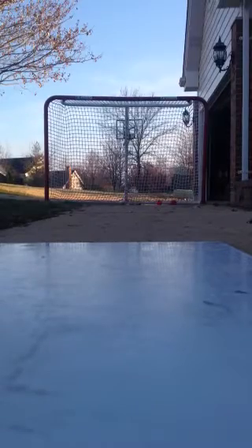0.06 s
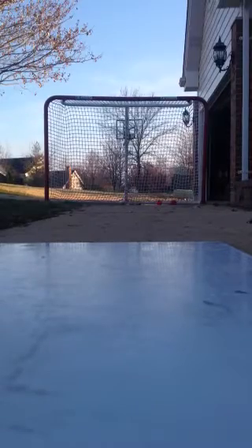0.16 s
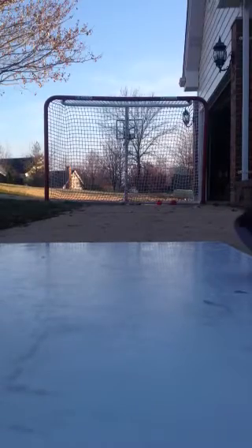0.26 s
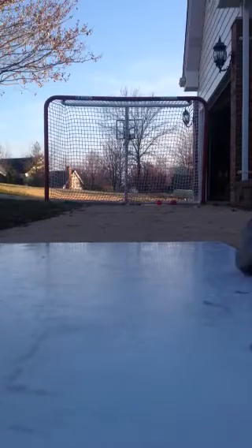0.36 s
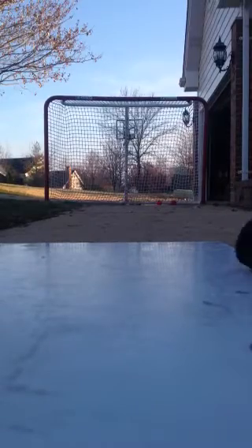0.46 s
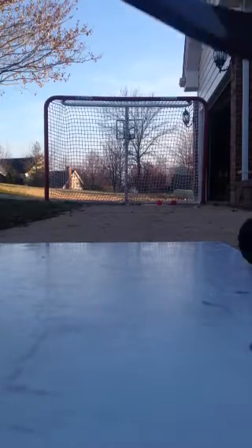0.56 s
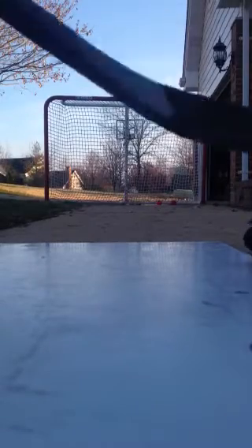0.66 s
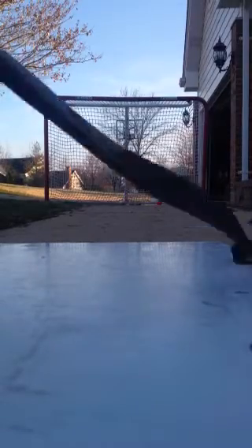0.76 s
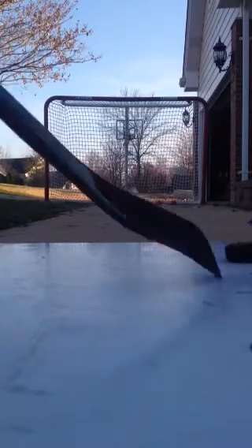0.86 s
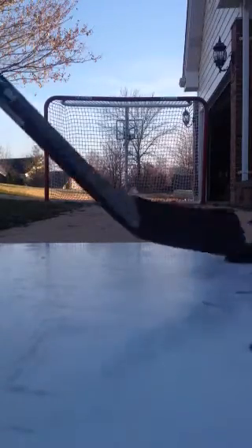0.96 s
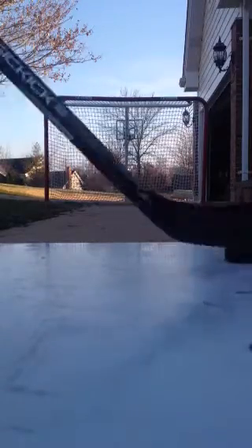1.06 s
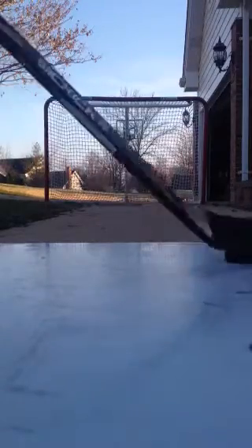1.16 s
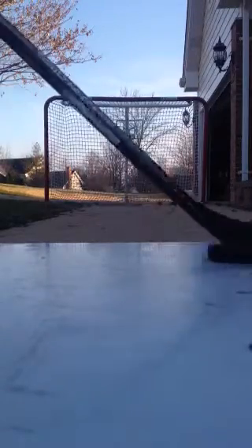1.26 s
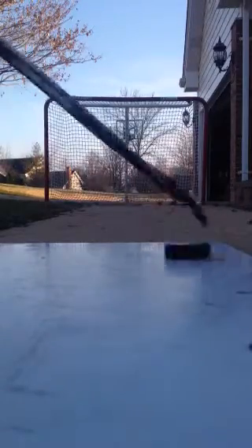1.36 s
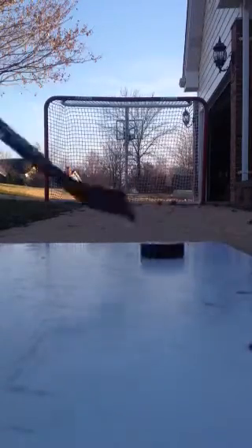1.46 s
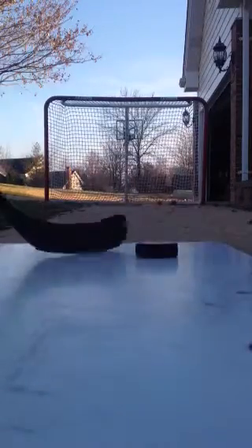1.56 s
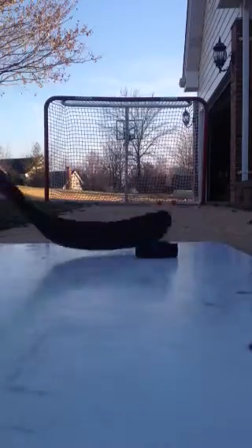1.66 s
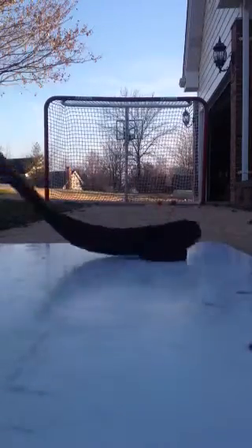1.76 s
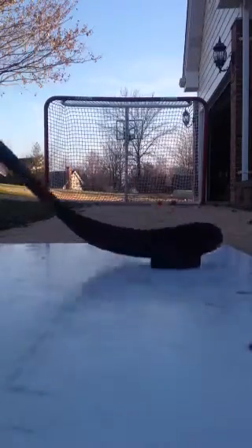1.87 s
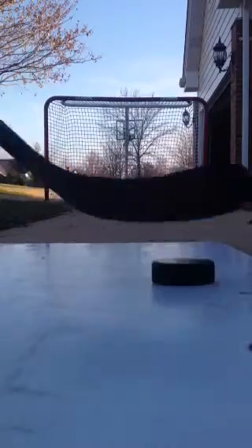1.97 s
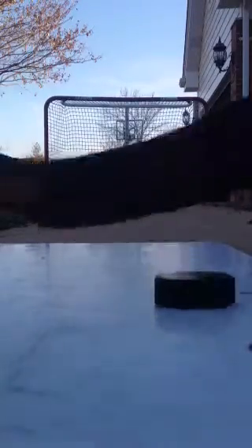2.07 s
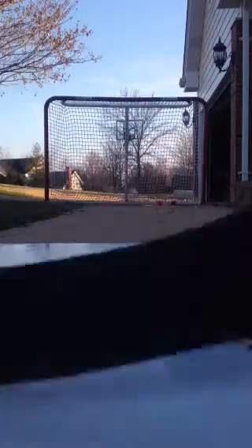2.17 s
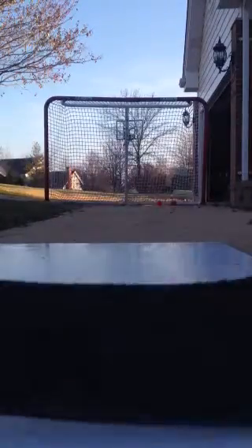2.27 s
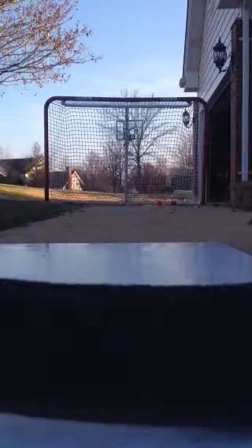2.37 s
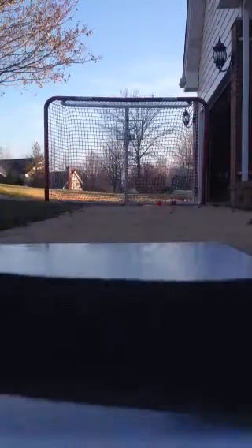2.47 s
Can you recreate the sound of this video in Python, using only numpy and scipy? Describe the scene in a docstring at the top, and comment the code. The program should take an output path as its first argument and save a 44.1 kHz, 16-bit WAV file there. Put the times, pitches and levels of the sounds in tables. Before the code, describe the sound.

A hockey stick clacks against a puck on a plastic pad, very close, with short driveway echoes. At 0.25 seconds the puck slaps down sharply and rattles. Light hollow taps cluster around 0.8 to 1 second. From 1.3 seconds the puck slides in hissing stretches, with a hard clack at 1.6, a thud at 1.75, a tiny squeak at 1.9, a firm hit at 2.25 and another thud just after.

```python
"""Stick and puck in a driveway

Close up, from a phone lying on the plastic practice pad. The puck slaps down and rattles,
the blade clacks against puck and pad, the puck thuds and slides with a fine hiss and one squeak.
The house wall and the yard answer each blow; the microphone port rings near 6 kHz."""
import sys
import numpy as np
from scipy import signal
from scipy.fft import rfft, irfft
from scipy.io import wavfile
from scipy.ndimage import uniform_filter1d, minimum_filter1d

SR = 44100
rng = np.random.default_rng(int(sys.argv[2]) if len(sys.argv) > 2 else 0)


def master(y):
    """Save y as 16-bit WAV."""
    cut = np.clip(np.atleast_2d(y).T, -1, 1)
    pcm = np.round(cut * 32767)  # scale
    wavfile.write(sys.argv[1], SR, pcm.astype(np.int16))


N = 112455
TOP_HZ = 15200  # upper edge of the phone's range


def clacks():
    """Each contact is a bright crack and a hollow knock that sets the blade ringing, with its echo."""
    # hard contacts of blade, puck and pad
    # (time [s], crack [dB], crack decay [ms], knock [dB], knock centre [Hz], echo [dB])
    contacts = [(0.2475, -7.5, 0.45, -34, 2500, -8), (0.249, -3, 1.1, -25.5, 2500, -8),
                (0.2511, -2, 1.87, -30, 2480, -3), (0.2655, -19.5, 0.92, -38.5, 2000, 16),
                (.3160, -28.5, 0.87, -36, 1790, -1), (0.3581, -21, 2.84, -32.5, 1890, 0.5),
                (0.4558, -32, 1.32, -40.5, 1870, 3.5), (0.4855, -40, 1.4, -44.5, 1800, -4),
                (0.568, -50.5, 1.1, -54, 1697, 4), (0.7477, -33.5, 3.2, -33, 1700, -3),
                (.7890, -19, 2.66, -26, 2030, 4), (.8440, -44, 3.2, -37.5, 1340, 0),
                (0.867, -34, 2.55, -36.5, 1470, 5.5), (0.8901, -20, 2.7, -26, 1580, 3.5),
                (0.938, -26.5, 3.8, -30.5, 1430, 5.5), (.9530, -25, 2.26, -28, 1410, -0.5),
                (0.9892, -28.5, 3.5, -28, 1485, -1.5), (1.2591, -35.5, 2, -36, 1080, 0.5),
                (1.3821, -23, 1.84, -27, 1160, -4), (1.6020, -13, 2.46, -17, 1330, 0),
                (1.6120, -18, 4.7, -22, 1640, -6), (1.6230, -22.5, 3.7, -21.5, 1460, -14),
                (1.6327, -18, 1, -42, 1600, 0), (1.7565, -29.5, 5.4, -28.5, 1200, 2),
                (1.836, -40, 3.2, -34.5, 1500, -7.5), (1.875, -37, 1.5, -37.5, 2600, -8),
                (1.9749, -27.5, 2.84, -26.5, 1170, -2), (2.165, -31, 1.45, -35, 2600, -5),
                (2.2372, -10, .9, -13, 1500, -3.5), (2.2444, -14.5, 4.1, -24.5, 870, 3.5)]
    # modes of the blade (frequency [Hz], level [dB])
    blade_modes = [(790, -8.5), (875, -9.5), (1060, -4), (1325, -10), (1500, -3.5), (1840, -7.5),
                   (2120, -4.5), (3570, -0.5)]
    # colour of the crack (frequency [Hz], gain [dB])
    crack_colour = [(100, -15.5), (400, -9), (1100, -10), (2600, -5), (6000, 0.5), (9000, -3),
                    (15000, -4.5)]
    knock_decay_s, mode_width_hz = 0.0021, 75
    out, t = np.zeros(N), np.arange(SR // 5) / SR
    bright = colour(signal.unit_impulse(N), crack_colour)[:SR // 100]
    for start, crack_db, decay_ms, knock_db, hz, echo_db in contacts:
        crack_noise, knock_noise = rng.standard_normal((2, len(t)))
        decay = decay_ms / 1000
        rise = .3 * decay  # longer contacts also swell more slowly
        crack = signal.fftconvolve(burst(crack_noise, t, rise, decay), bright)[:len(t)]
        push = burst(knock_noise, t, rise, knock_decay_s)
        soft_push = signal.lfilter(*signal.butter(1, 2 * hz, fs=SR), push)
        body = resonate(soft_push, hz, width=1.93)
        wood = body + sum(undb(db) * resonate(body, f, mode_width_hz / f) for f, db in blade_modes)
        knock = wood * push.std() / wood.std()
        blow = undb(crack_db) * crack + undb(knock_db) * knock
        add(out, start, blow)
        add(out, start, undb(echo_db) * driveway(blow))
    return out


def shot():
    """The blade meets the puck squarely and rings for only a few cycles."""
    # heavily damped modes of the blade loaded by the puck (frequency [Hz], level [dB], t60 [s])
    modes = [(1254, -11.5, .013), (2230, -13, 0.0077)]
    start_s, echo_db = 2.2375, -14.5
    out, t = np.zeros(N), np.arange(SR // 10) / SR
    blow = sum(undb(db) * np.sin(2 * np.pi * hz * t) * np.exp(-np.log(1000) * t / t60)
               for hz, db, t60 in modes)
    add(out, start_s, blow)
    add(out, start_s, undb(echo_db) * driveway(blow))
    return out


def thuds():
    """A soft push on the pad under the phone: one swing of pressure and a short boom of the sheet."""
    # flat blows on the pad (time [s], level [dB], softness cut-off [Hz], echo [dB])
    flat_blows = [(.2512, -18, 297, -26), (1.7539, -14.5, 1170, -9), (2.3686, -17, 970, -9)]
    pad_hz, boom_db = 198, -11
    out = np.zeros(N)
    for start, db, cutoff_hz, echo_db in flat_blows:
        push = signal.lfilter(*signal.butter(4, cutoff_hz, fs=SR), signal.unit_impulse(SR // 10))
        swing = signal.lfilter(*signal.butter(2, pad_hz, "high", fs=SR), push)
        thud = swing + undb(boom_db) * resonate(swing, pad_hz, width=0.348)
        blow = undb(db) * thud / np.abs(thud).max()
        add(out, start, blow)
        add(out, start, undb(echo_db) * driveway(blow, tail_share=.4))
    return out


def sliding():
    """Puck and blade glide over the pad and catch on grit; the blade drags more coarsely when pressed."""
    # course of the sliding hiss (time [s], level [dB])
    hiss_levels = [(0, -80), (.22, -77), (0.599, -88.5), (1.21, -83), (1.229, -76), (1.299, -46.5),
                   (1.35, -47), (1.374, -55.5), (1.409, -44.5), (1.50, -54), (1.59, -75), (1.745, -71),
                   (1.765, -43), (1.87, -43), (1.922, -39), (1.932, -35.5), (1.963, -45), (1.985, -33.5),
                   (2.01, -38.5), (2.06, -36.5), (2.21, -40), (2.30, -43), (2.356, -44), (2.40, -52),
                   (2.44, -69), (2.499, -44.5), (2.55, -47.5)]
    # drags over the pad: short ones of the blade and a long low one of the rolling puck (start [s], length [s],
    # level [dB])
    scrapes = [(1.218, 0.044, -42.5), (1.244, 0.38, -57), (2.193, 0.034, -46)]
    # colour of the light glide (frequency [Hz], gain [dB])
    hiss_colour = [(100, -12.5), (300, -16), (900, -7), (2000, -6), (4000, -4), (6000, -2), (9000, 0),
                   (15000, 4.5)]
    # colour of the coarse drag (frequency [Hz], gain [dB])
    drag_colour = [(100, -7.5), (300, 6.5), (900, 10), (2000, 3.5), (6000, -6.5), (15000, -14)]
    catches_per_s, catch_db, catch_decay_s = 79, -15.5, 0.0022
    level = undb(np.interp(np.arange(N) / SR, *np.array(hiss_levels).T))
    snags = (rng.random(N) < catches_per_s / SR) * rng.random(N)
    catches = signal.lfilter([1], [1, -np.exp(-1 / (catch_decay_s * SR))], snags)
    pressure = undb(catch_db) * level * catches
    for start, length, db in scrapes:
        add(pressure, start, undb(db) * signal.windows.tukey(int(length * SR), .5))
    return colour(friction(), hiss_colour) * level + colour(friction() * pressure, drag_colour)


def friction():
    """Fine hiss with tiny grains of grit; narrow bands flare and fade singly as the contact shifts."""
    grains_per_s, grain_spread_db, grit_db = 1200, 2, -2
    band_hz, flare_db, flicker_db = 400, 3.5, 3
    grit = (rng.random(N) < grains_per_s / SR) * np.sign(noise())
    grit *= undb(grain_spread_db * np.minimum(rng.exponential(size=N), 6))
    size = 2 ** 17
    spectrum = rfft(noise() + undb(grit_db) * grit / grit.std(), size)
    band_position = np.arange(len(spectrum)) * SR / size / band_hz
    hiss = np.zeros(N)
    for k in range(int(TOP_HZ / band_hz) + 2):
        band = irfft(spectrum * np.maximum(1 - np.abs(band_position - k), 0))[:N]
        hiss += band * undb(flare_db * walk(rate_hz=55))
    return hiss / hiss.std() * undb(flicker_db * walk(rate_hz=90))


def squeak():
    """The gliding plastic catches briefly and chirps."""
    start_s, length_s, pitch_hz, level_db = 1.926, .022, 5570, -41
    out, window = np.zeros(N), signal.windows.tukey(int(length_s * SR), .5)
    wavering_hz = pitch_hz * (1 + 0.016 * walk(rate_hz=570))
    tone = np.sin(2 * np.pi * np.cumsum(wavering_hz) / SR)
    add(out, start_s, undb(level_db) * window * tone[:len(window)])
    return out


def driveway(x, tail_share=1):
    """Near reflections and a short scattered tail; each spot on the pad scatters in its own way."""
    # early reflections off nearby walls (delay [s], level [dB])
    walls = [(.0070, -17), (0.0122, -17), (0.0196, -27.5)]
    # outdoor tail (low edge [Hz], high edge [Hz], level [dB], t60 at full tail_share [s])
    tail_bands = [(179.4, 510, 1.5, 0.28), (477, 1165, 2.5, 0.19), (1252, 2970, -3, 0.12),
                  (2900, 4460, -9.5, .18), (7520, 20000, -15.5, 0.28)]
    onset_s, delay_spread = 0.0026, .12
    t = np.arange(SR // 3) / SR
    onset = 1 - np.exp(-(t / onset_s) ** 2)
    response = np.zeros(len(t))
    for lo, hi, db, t60 in tail_bands:
        bandpass = signal.butter(2, [lo, min(hi, .45 * SR)], "band", fs=SR, output="sos")
        band = signal.sosfilt(bandpass, rng.standard_normal(len(t)))
        envelope = onset * np.exp(-np.log(1000) * t / (tail_share * t60))
        response += undb(db) * band * envelope / np.sqrt(np.sum(envelope ** 2))
    for delay, db in walls:
        response[int(delay * (1 + delay_spread * rng.uniform(-1, 1)) * SR)] += undb(db)
    return signal.fftconvolve(x, response)


def yard():
    """The quiet yard all around: a low rumble and a thin hiss, wavering slightly."""
    # colour of the outdoor background (frequency [Hz], gain [dB])
    yard_colour = [(30, 10), (170, 15.5), (320, 11.5), (2000, -2), (5000, -17), (9000, -10), (15000, 10.5)]
    return undb(-67 + walk(rate_hz=3.1)) * colour(noise(), yard_colour)


def burst(x, t, rise, decay):
    """A dense crackle with an even spectrum that swells, decays and is damped after a few decay times."""
    envelope = (1 - np.exp(-(t / rise) ** 2)) * np.exp(-t / decay)
    for _ in range(5):  # even out the amplitude and the spectrum in turn
        flat = irfft(np.exp(1j * np.angle(rfft(x * envelope))), len(t))
        x = np.sign(flat)
    damping = np.exp(-(t / (6 * decay)) ** 2)
    return flat * damping * np.sqrt(decay * SR / 2.26)


def colour(x, points):
    """Causal filter through the points (frequency [Hz], gain [dB])."""
    size = 2 ** 18
    hz, db = np.array(points, float).T
    f = np.maximum(np.arange(size // 2 + 1) * SR / size, 1)
    cepstrum = irfft(np.log(undb(np.interp(np.log(f), np.log(hz), db))))
    cepstrum[1:size // 2] *= 2  # fold for minimum phase
    cepstrum[size // 2 + 1:] = 0
    return irfft(rfft(x, size) * np.exp(rfft(cepstrum)))[:N]


def resonate(x, hz, width):
    """One resonance; width is a share of its centre frequency."""
    return signal.lfilter(*signal.iirpeak(hz, 1 / width, fs=SR), x)


def walk(rate_hz):
    """Smooth random drift with a spread near 1."""
    step = max(int(SR / rate_hz), 1)
    return uniform_filter1d(np.repeat(rng.standard_normal(N // step + 1), step), step)[:N]


def noise():
    """White noise of unit strength."""
    return rng.standard_normal(N)


def undb(db):
    """Decibels to gain."""
    return 10 ** (np.asarray(db) / 20)


def add(track, start, x):
    """Mix x into the track from the start time on."""
    i = max(int(start * SR), 0)
    track[i:i + len(x)] += x[:max(N - i, 0)]


def scene():
    """Close blows and sliding with their echoes, over the quiet yard."""
    slide = sliding() + squeak()
    background = yard()
    blows = clacks() + shot() + thuds()
    slide_echo = undb(-6.5) * driveway(slide)[:N]
    return (blows + slide + slide_echo + background)[None]


def record(dry):
    """The microphone port rings, a fast limiter holds the peaks, the deepest bass and the top are cut."""
    # response of the phone's microphone and its port (frequency [Hz], gain [dB])
    microphone = [(25, -30.5), (60, -19), (130, 0), (450, -2.5), (1000, -1), (2200, 3), (2900, 0),
                  (3400, 3), (3950, 0), (4900, 6), (5400, 7), (5850, 12.5), (6300, 12), (7100, 3),
                  (8300, -1.5), (10000, -10), (12500, -22), (15000, -24)]
    ceiling, span = .72, int(.0015 * SR)  # the limiter acts over 1.5 ms
    y = colour(dry[0], microphone)
    gain = ceiling / np.maximum(np.abs(y), ceiling)
    y = y * uniform_filter1d(minimum_filter1d(gain, span), span)
    y = signal.sosfilt(signal.butter(1, 35, "high", fs=SR, output="sos"), y)
    return signal.sosfilt(signal.ellip(8, .2, 80, TOP_HZ, fs=SR, output="sos"), y)[None]


dry = scene()
out = record(dry)
master(out)
```